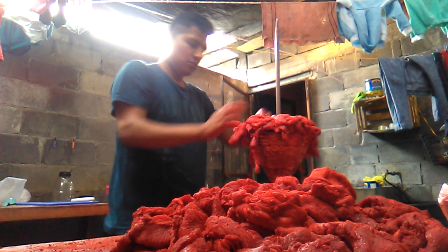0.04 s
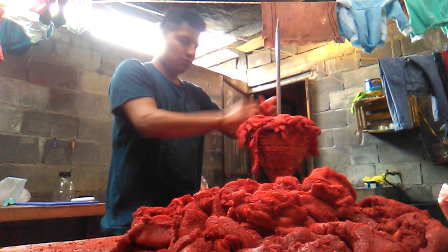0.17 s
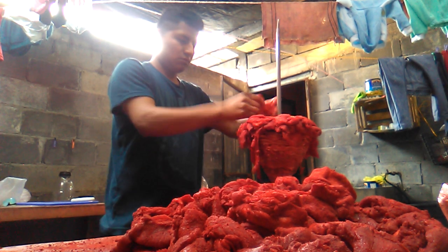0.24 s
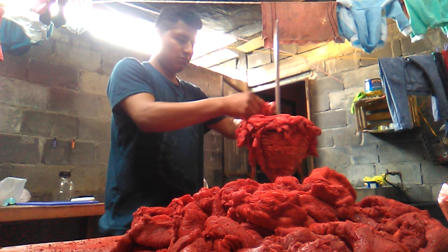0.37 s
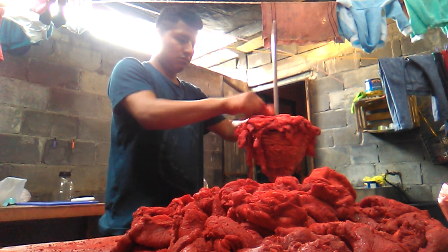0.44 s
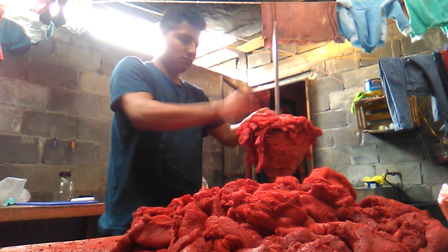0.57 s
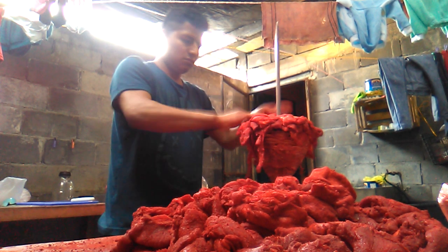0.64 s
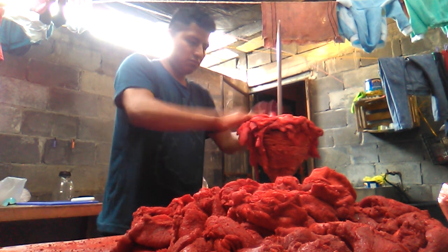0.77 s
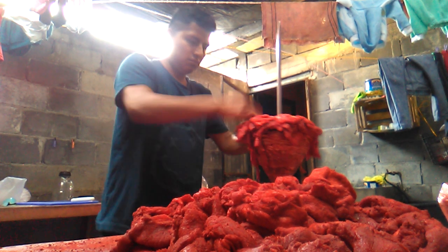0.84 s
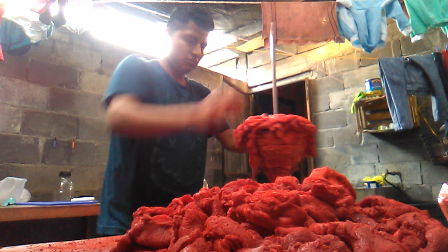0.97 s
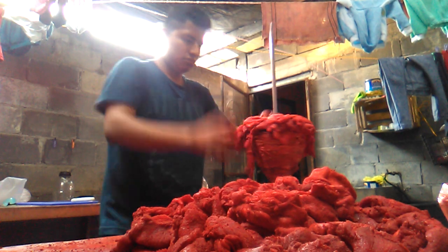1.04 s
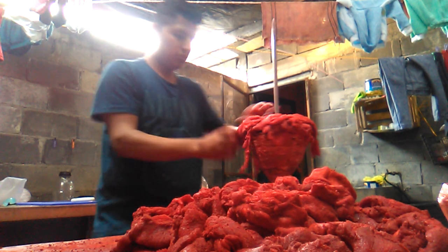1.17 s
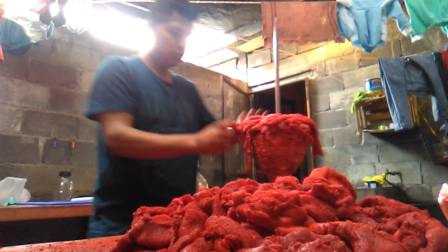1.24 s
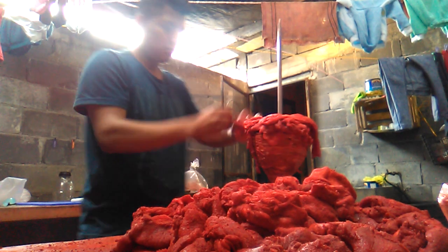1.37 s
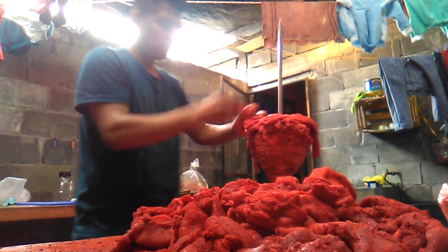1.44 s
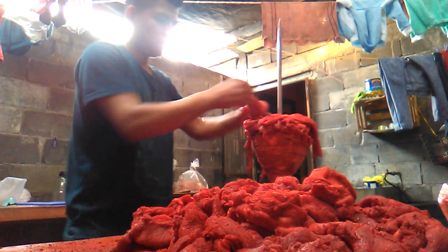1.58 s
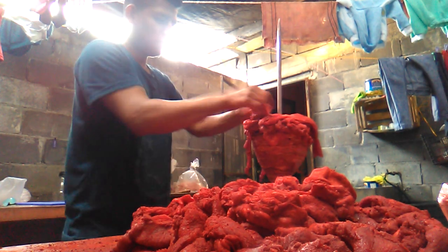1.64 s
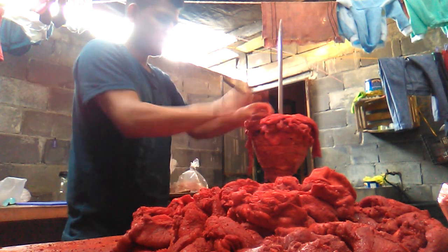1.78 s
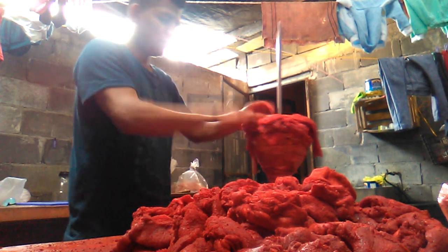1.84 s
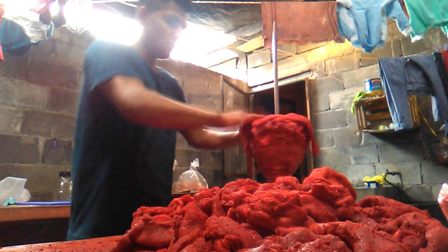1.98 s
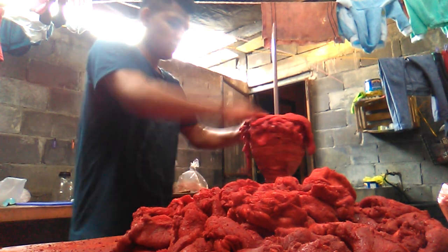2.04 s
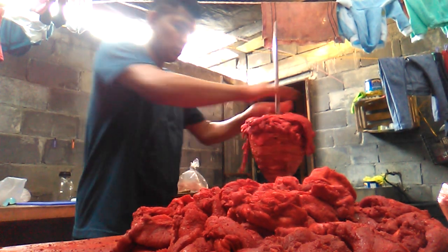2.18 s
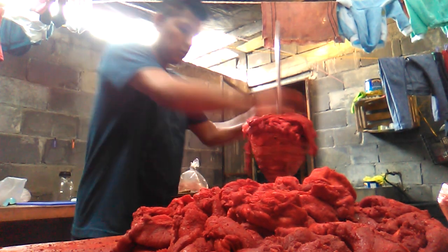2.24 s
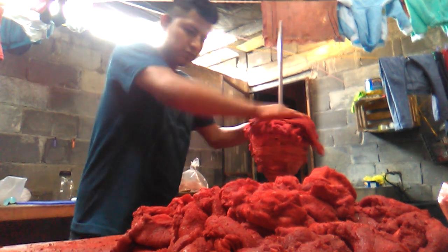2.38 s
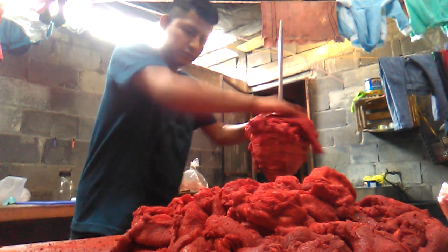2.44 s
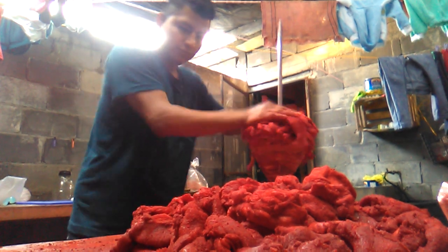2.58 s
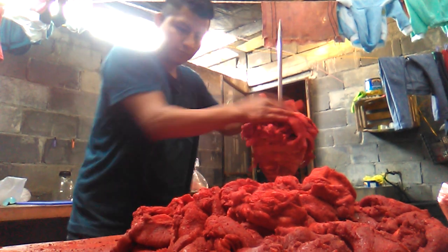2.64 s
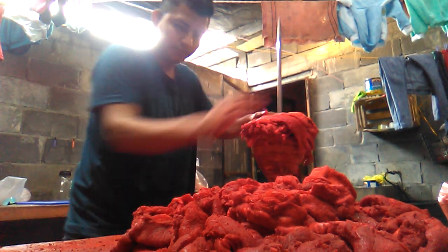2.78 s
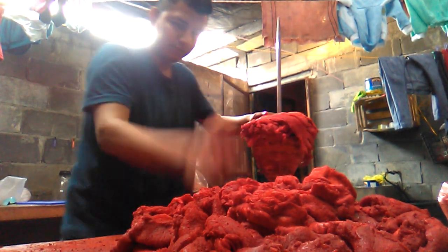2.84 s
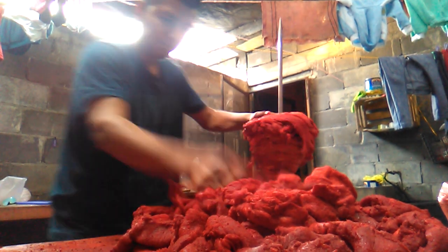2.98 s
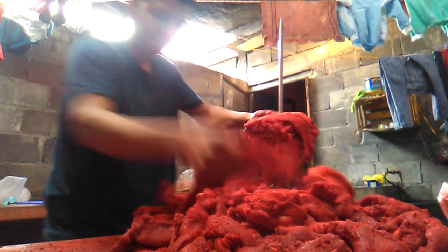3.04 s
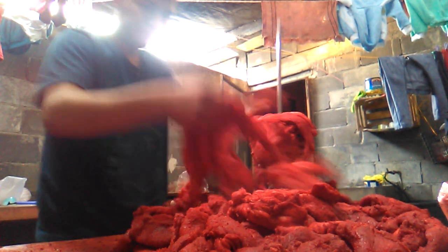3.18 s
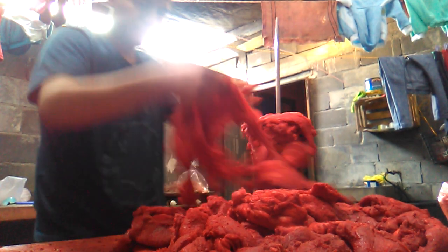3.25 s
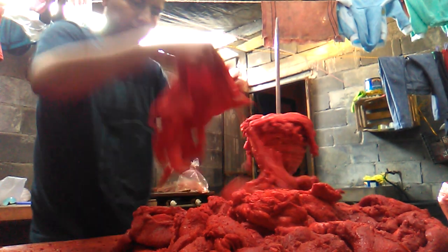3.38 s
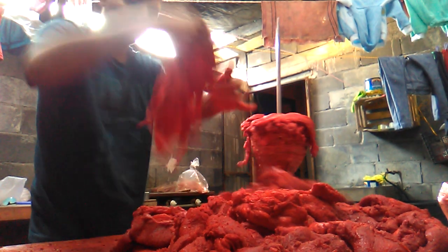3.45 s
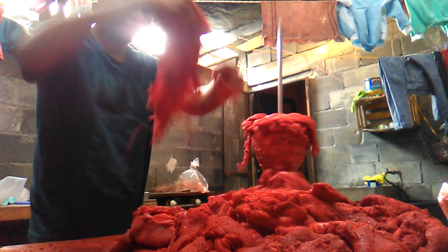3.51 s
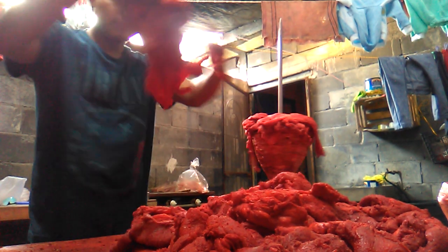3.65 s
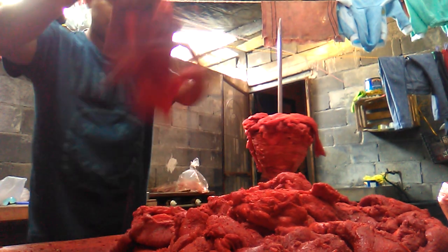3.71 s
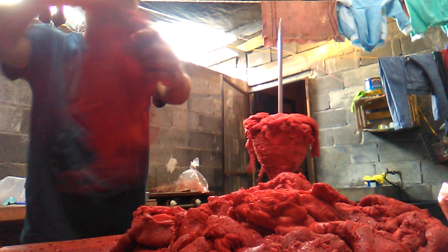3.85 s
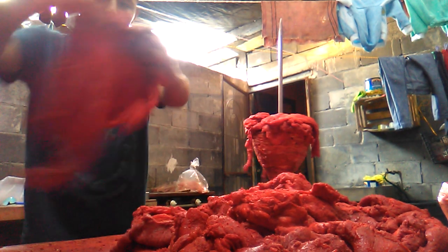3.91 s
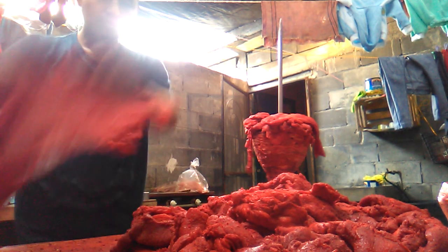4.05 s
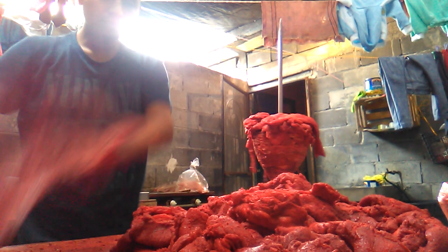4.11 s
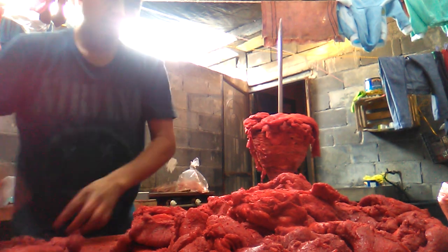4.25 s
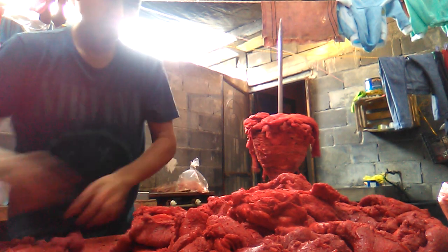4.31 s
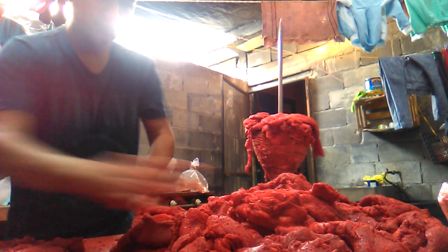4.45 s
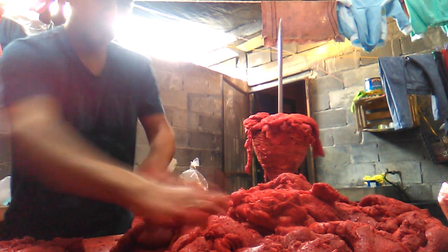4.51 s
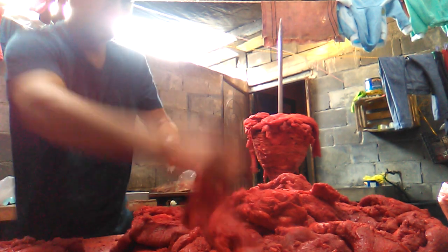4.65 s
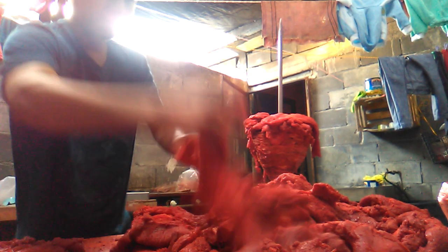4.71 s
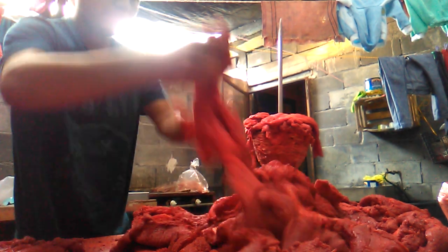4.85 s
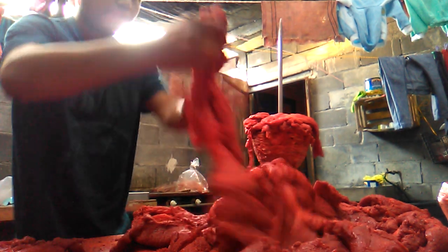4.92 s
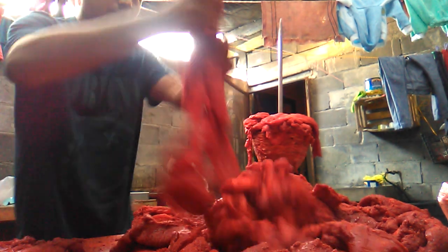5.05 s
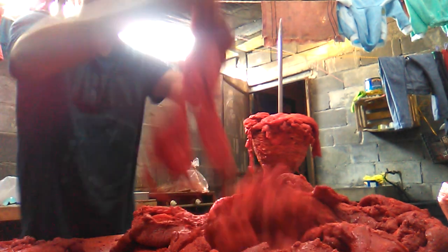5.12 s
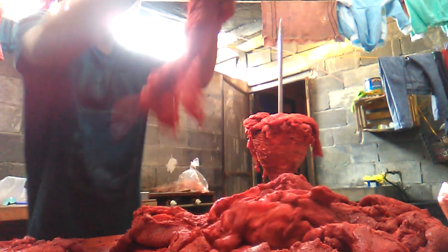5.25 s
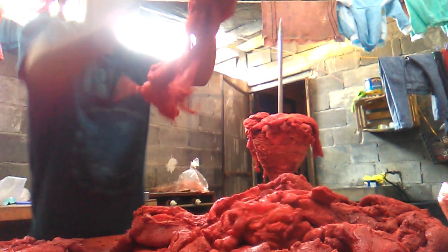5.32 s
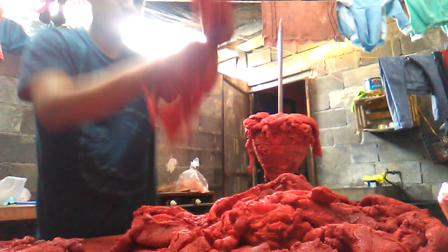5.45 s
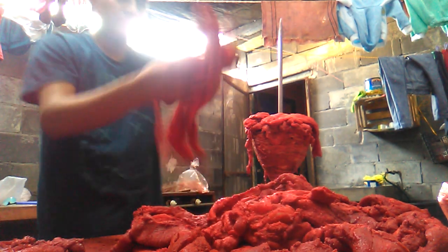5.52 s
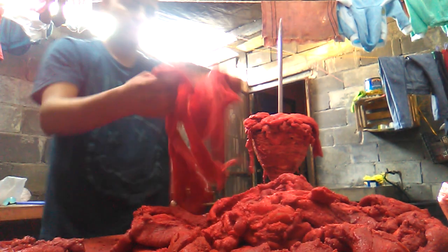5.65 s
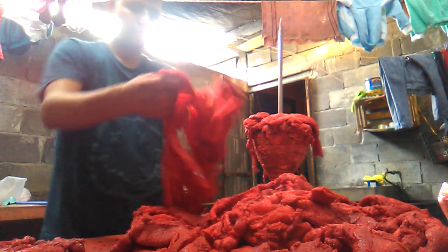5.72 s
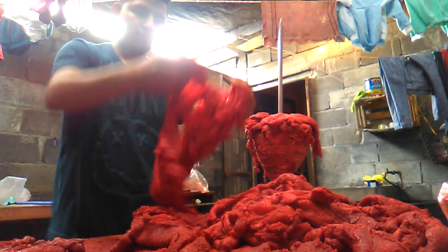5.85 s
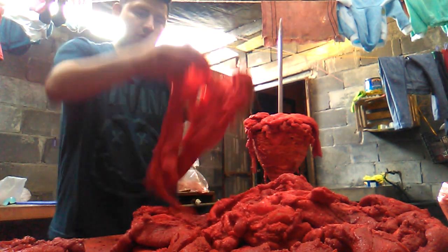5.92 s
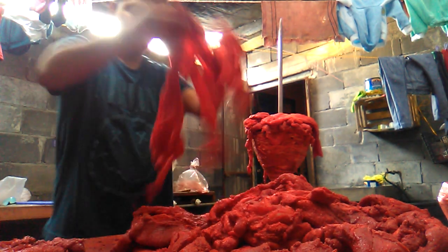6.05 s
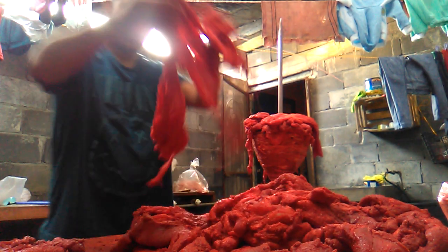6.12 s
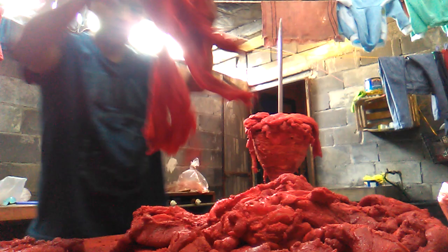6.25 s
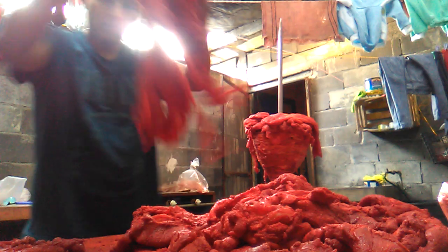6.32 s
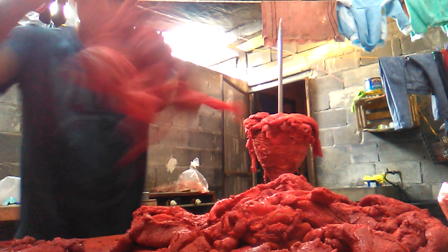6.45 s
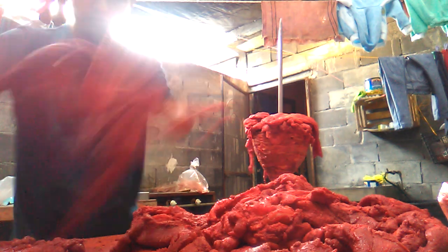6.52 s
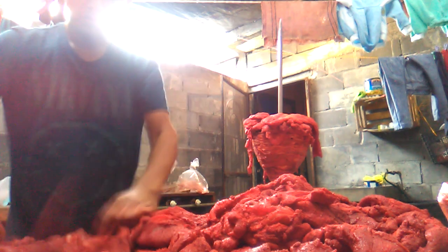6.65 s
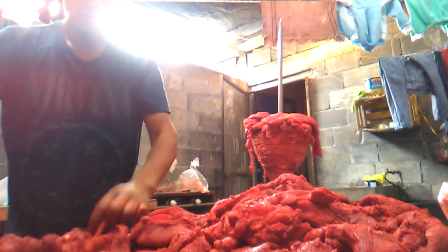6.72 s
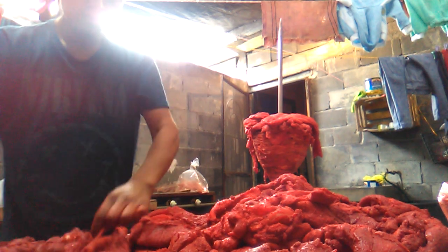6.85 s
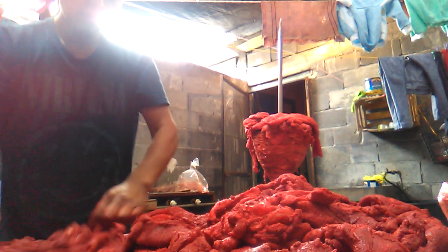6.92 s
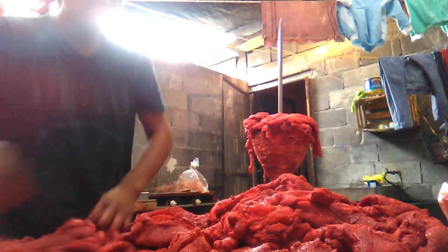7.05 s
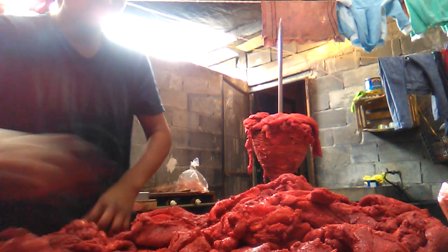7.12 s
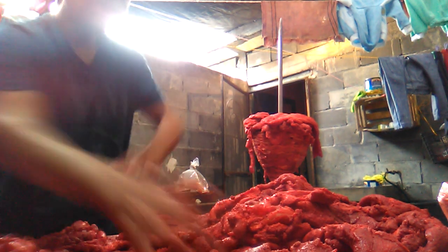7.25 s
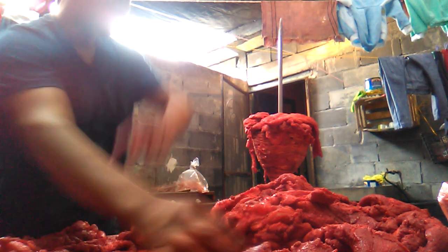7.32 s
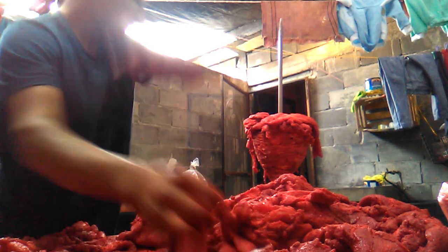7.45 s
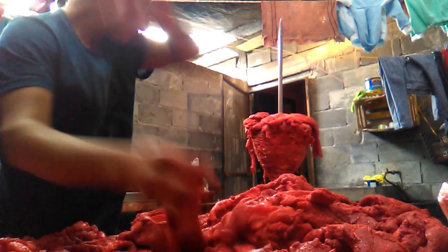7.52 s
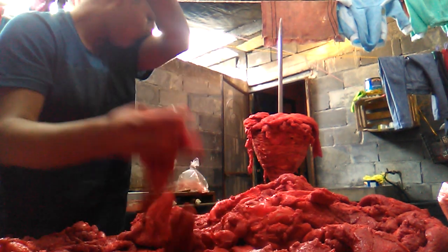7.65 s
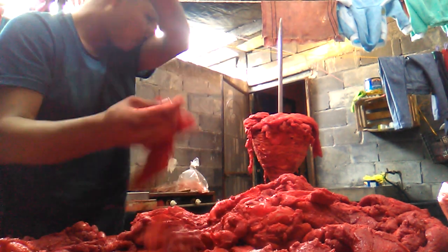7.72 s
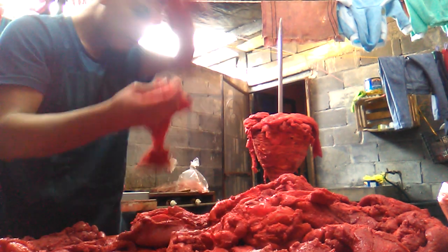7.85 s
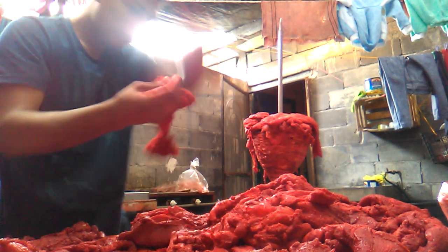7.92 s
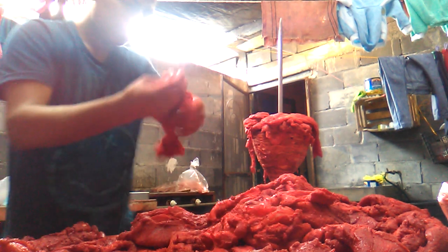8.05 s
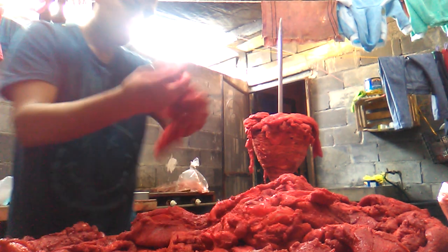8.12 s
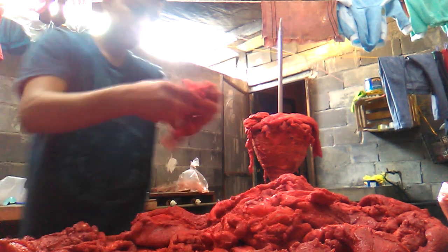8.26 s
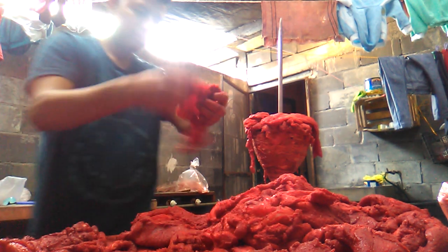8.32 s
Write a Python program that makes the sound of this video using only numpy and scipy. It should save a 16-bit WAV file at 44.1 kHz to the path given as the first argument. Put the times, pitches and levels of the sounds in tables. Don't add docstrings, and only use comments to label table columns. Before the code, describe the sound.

Wet slices of meat are softly patted, peeled with sticky crackles, and slapped down hard three times in a bare block room over faint traffic rumble.

```python
import sys
import numpy as np
from scipy import signal
from scipy.io import wavfile
from scipy.ndimage import uniform_filter1d

SR = 44100
rng = np.random.default_rng(int(sys.argv[2]) if len(sys.argv) > 2 else 0)


def master_out(mix):
    frames = np.transpose(np.atleast_2d(mix))
    ceiling = np.clip(frames, -1, 1)
    pcm = np.round(ceiling * 32767).astype(np.int16)
    wavfile.write(sys.argv[1], SR, pcm)


def ratio_of_db(decibels):
    return 10 ** (np.asarray(decibels, float) / 20)


N = 369999


def smacks():
    # t/s, body peak level/dB, body f/Hz, spray level/dB, spray f/Hz
    flaps = [(2.322, -48, 305, -51, 3800), (2.328, -15.5, 470, -53, 3100), (2.3267, -50, 830, -26.5, 4900),
             (2.329, -42, 1250, -34, 9500), (2.333, -38, 1240, -50.5, 900), (2.343, -33.5, 490, -53, 900),
             (2.357, -33, 462, -60, 4800), (4.2226, -34.5, 297, -55.5, 2300),
             (4.228, -36, 230, -39.5, 3680), (4.2325, -29.5, 219, -46.5, 1600),
             (4.232, -33.5, 800, -45, 1000), (4.237, -28, 263, -53, 3800),
             (4.243, -17.5, 1210, -17.5, 2500), (4.2436, -14.5, 1320, -25, 2700),
             (4.2444, -22, 383, -39.5, 1490), (4.2466, -15, 1320, -14, 5660), (4.2478, -27, 815, -21, 3200),
             (4.2532, -20, 210, -43.5, 1800), (4.2575, -28, 706, -42.5, 1738),
             (4.271, -30.5, 605, -45, 3300), (6.648, -43, 280, -52, 1470), (6.652, -35, 297, -56.5, 4540),
             (6.6612, -39, 510, -37.5, 4500), (6.664, -42, 300, -49.5, 1600),
             (6.672, -36.5, 500, -46, 5500), (6.6725, -47, 1100, -45.5, 1300),
             (6.6768, -27.5, 220, -43, 2900), (6.686, -39, 844, -37, 2380), (6.6921, -16.5, 340, -45, 2400),
             (6.6907, -20, 810, -22, 2400), (6.69, -42, 860, -31, 4800), (6.6957, -20, 876, -19.5, 4583),
             (6.697, -18.5, 900, -32, 2430), (6.6996, -19.5, 385, -45, 2000),
             (6.7084, -29.5, 300, -40, 2220), (6.717, -34, 423, -45.5, 2500)]
    splashes = [
        (2.331, -34, 666, -58, 4700),
        (4.211, -40, 250, -64.5, 1500),
        (4.2478, -17, 367, -50.5, 2000),
        (6.505, -66, 390, -75, 1690),
        (6.6965, -15.5, 383, -53, 2000),
    ]
    # t/s, peak level/dB
    thumps = [
        (2.328, -34.5),
        (4.2417, -15),
        (6.691, -22.5),
    ]
    # f/Hz, level/dB, t60/s
    table_modes = [(68, -4.5, .1), (94.4, 1, 0.085), (122.7, -0.5, 0.1), (156.4, 1, 0.062),
                   (306.5, -2.5, 0.039), (410, -6.5, 0.066), (716, -13.5, 0.069)]
    # f/Hz, level/dB per Hz
    spray_spectrum = [(300, -36), (800, 8.5), (2500, -1), (5000, -3.5), (7500, -9), (10000, -12.5),
                      (14500, -27)]
    spray_cycles, splash_t60_s = 42, 0.26
    squeeze_lead_cycles = 0.44
    body_highpass_hz = 62

    body, spray, t = np.zeros(N), np.zeros(N), np.arange(8192) / SR
    rows = [(*row, spray_cycles / row[-1]) for row in flaps]
    rows += [(*row, splash_t60_s) for row in splashes]
    puffs = rng.standard_normal((len(rows), 8192))
    for (s, db, hz, spray_db, spray_hz, t60), puff in zip(rows, puffs):
        add(body, s - squeeze_lead_cycles / hz, ratio_of_db(db) * squeeze(hz))
        width = 1.3 if spray_hz > 4600 else 1.6 + 5.0 * t60
        drops = band(puff, spray_hz, width) + 0.76 * puff
        rise = 1 - np.exp(-t / min(0.12 * t60, .004))
        add(spray, s, ratio_of_db(spray_db - 60 * t / t60) * rise * drops)
    for s, db in thumps:
        boom = sum(ratio_of_db(d) * ring(f, t60, 0.0044) for f, d, t60 in table_modes)
        add(body, s, ratio_of_db(db) * boom)
    highpass = signal.butter(2, body_highpass_hz, "high", fs=SR, output="sos")
    return signal.sosfilt(highpass, body), colour(spray, spray_spectrum)


def squeeze(hz):
    cycles, skew = 2.1, .8
    u = np.linspace(0, 1, round(cycles * SR / hz))
    return np.sin(np.pi * u ** skew) ** 2 * np.sin(2 * np.pi * cycles * u)


def pats():
    # t/s, peak level/dB, thud f/Hz, stand rattle level/dB, arm weight level/dB
    hits = [(0.442, -51, 371, -22, -4.5), (0.501, -55, 367, -24, -1.5), (0.845, -37, 457, -21, -11.5),
            (0.987, -53.5, 330, -20, -2.5), (1.024, -54, 454, -29, -7), (1.187, -39, 476, -21.5, -9),
            (1.346, -40.5, 490, -18, -9), (1.855, -45.5, 603, -31, -19), (1.98, -53, 334, -11, -3),
            (2.0496, -33, 438, -18, -10), (2.18, -66, 335, -25, 8), (2.294, -42.5, 376, -23.5, -8.5),
            (2.7665, -36.5, 460, -19, -10), (2.961, -42.5, 438, -28, -8.5), (3.188, -51, 410, -23, -5.5),
            (3.5617, -43, 478, -25, -6.5), (6.935, -53, 335, -21, 6)]
    heights = [0.12, .1, 0.11, 0.13, .1, 0.1, 0.17, .1, 0.15, 0.046, .1, 0.16, 0.14, .16, .1, .15, .1]
    # f/Hz, level/dB, t60/s
    stand_modes = [(900, 4.5, 0.014), (1160, -1.5, 0.008), (1600, -1.5, 0.018), (2330, -0.5, 0.011),
                   (3270, -4, 0.013), (4800, -23, 0.0049)]
    # t/s, peak level/dB
    bumps = [
        (5.074, -40.5),
        (7.339, -39),
    ]
    mode_spread, rattle_t60_s, rattle_rise_s = .01, .02, 0.0014
    push_db, bass_db = 3.5, -0.5

    out, t = np.zeros(N), np.arange(4096) / SR
    draws = rng.standard_normal((len(hits), 4096 + 2 * len(stand_modes)))
    for (s, db, hz, ring_db, weight_db), height, draw in zip(hits, heights, draws):
        rattle, (shift, sway) = draw[:4096], draw[4096:].reshape(2, -1)
        decay = ratio_of_db(-60 * t / rattle_t60_s) + 0.14 * ratio_of_db(-60 * t / 0.12)
        shake = rattle * decay * (1 - np.exp(-t / rattle_rise_s))
        knock = np.zeros(len(t))
        for (f, d, t60), v, w in zip(stand_modes, shift, sway):
            mode = signal.fftconvolve(ring(f * (1 + mode_spread * v), t60), shake)[:len(t)]
            knock += ratio_of_db(d + 0.69 * w) * np.cos(np.pi * height * f / 900) * evened(mode)
        wet = band(rattle, 850, 2.9) * ratio_of_db(-60 * t / 0.17) * (1 - np.exp(-t / 0.00067))
        wet_top = band(rattle[::-1], 2240, 1.6) * ratio_of_db(-60 * t / 0.045) * (1 - np.exp(-t / .0004))
        wet = wet + 0.75 * wet_top
        thud = ring(hz, 9 / hz, 0.0029) + 0.23 * ring(1.28 * hz, 11 / hz, 0.0043)
        push = ratio_of_db(weight_db + push_db) * ring(229.0, 0.036, 0.004)
        push = push + ratio_of_db(weight_db + bass_db) * ring(125.8, 0.1, 0.011)
        stand = ratio_of_db(ring_db) * (knock / abs(knock).max() + 0.13 * wet)
        add(out, s, ratio_of_db(db + 13.5) * (thud + push + stand))
    for s, db in bumps:
        add(out, s, ratio_of_db(db) * ring(103, 0.088, 0.0034))
    return out


def peeling():
    # t/s, length/s, level/dB, change over the stroke/dB, drag (0 lifted - 1 scraped)
    strokes = [(0.874, 0.41, -82.5, 0, 0.79), (1.904, 0.087, -83, -4, .3), (2.07, 0.32, -80, -6, 0.73),
               (2.39, 0.43, -79, -8, 0.9), (2.825, 0.28, -90, 12, 0.25), (3.116, 0.13, -79.5, 9, 0.093),
               (3.269, 0.22, -73.5, -13, .2), (4.399, 0.16, -81.5, -3.5, 0.72), (4.577, 0.1, -77, 6, 0.4),
               (4.699, 0.18, -83.5, 10, 0.31), (4.888, 0.25, -76.5, -2.5, .2),
               (5.147, 0.22, -78.5, -5.5, 0.53), (5.476, 0.11, -72.5, -11, 0.57),
               (5.596, .12, -80, -5, 0.14), (5.716, 0.45, -84, -7, 0.35), (6.46, 0.28, -79.5, -2.5, 1.14),
               (6.805, 0.188, -79.5, 11, 1.1), (6.995, 0.17, -70, -3, 0.88), (7.203, 0.14, -98, 2, 0.39),
               (7.34, 0.091, -75, 0.5, .1), (7.44, 0.068, -69.5, -1, 0.14), (7.513, 0.16, -75, 1, 0.29),
               (7.694, 0.51, -80.5, -4.5, 0.73)]
    # f/Hz, level/dB per Hz
    film_spectrum = [(1180, -42), (2000, -2), (2160, -10), (2490, -11), (3970, 2), (4460, 1), (5720, 2),
                     (8200, -13), (10700, -62), (18000, -120)]
    # f/Hz, level/dB per Hz
    air_spectrum = [(7500, -16), (9000, -0.5), (10500, 2.5), (12500, -1), (14500, -10)]
    # f/Hz, level/dB per Hz
    slide_spectrum = [(530, -23), (900, -0.5), (1500, -2), (1910, -3), (3150, -9), (4370, -23), (7940, -19),
                      (9000, -26), (11700, -49), (19800, -120)]
    edge_s = 0.019
    scrape_db, air_db = (-9, 2.5), (-3.5, -16)
    slots_per_s, bursts_per_s, spread_db, cycles, smooth = 4000, 1500, 3.5, 12.0, 1.2
    grain_hz = np.geomspace(2800, 8500, num=12)

    level, low, air = np.zeros((3, N))
    for s, length, db, change_db, drag in strokes:
        t = np.arange(-edge_s, length + edge_s, 1 / SR)
        edge = np.clip(np.minimum(t, length - t) / edge_s + 1, 0, 2)
        stroke = np.sin(np.pi * edge / 4) ** 2 * ratio_of_db(db + change_db * t / length)
        start = s - edge_s
        add(level, start, stroke)
        add(low, start, stroke * ratio_of_db(scrape_db[0] + drag * (scrape_db[1] - scrape_db[0])))
        add(air, start, stroke * ratio_of_db(air_db[0] + drag * (air_db[1] - air_db[0])))

    count, grains = round(slots_per_s * N / SR), np.zeros(N + 1024)
    at, size, kind, keep = rng.random((count, 4)).T
    burst_gain = ratio_of_db(spread_db * np.minimum(-np.log(size + 1e-9), 3.4))
    burst_gain = (keep < bursts_per_s / slots_per_s) * burst_gain
    for k, hz in enumerate(grain_hz):
        t = np.arange(round(cycles * SR / hz)) / SR
        grain = ratio_of_db(read(film_spectrum, hz)) * np.sqrt(hz) * np.hanning(len(t)) * np.sin(2 * np.pi * hz * t)
        mine = (kind * len(grain_hz)).astype(int) == k
        places = (at[mine] * N).astype(int)[:, None] + np.arange(len(t))
        np.add.at(grains, places, burst_gain[mine][:, None] * grain)
    film = evened(grains[:N]) + smooth * noise(film_spectrum, patchy_db=4.0, size=512)
    hiss = air * noise(air_spectrum, patchy_db=2.2, size=512)
    scrape = low * noise(slide_spectrum, patchy_db=-1.5, size=512)
    return level * evened(film) + hiss + scrape


def snaps():
    # t/s, peak level/dB, f/Hz
    wet_pops = [(0.6594, -64, 4960), (1.2794, -62, 4620), (1.8462, -53, 5000), (2.0033, -42, 4700),
                (2.2837, -54, 4440), (2.4598, -57, 5000), (2.5451, -50, 4560), (2.6643, -70, 3900),
                (2.7402, -49.5, 3980), (3.2181, -52, 5430), (3.3164, -45.5, 4200), (4.0432, -55, 4540),
                (4.0726, -70, 4800), (4.6189, -61, 5680), (4.6498, -51, 5940), (4.6644, -50, 4200),
                (4.8494, -61, 5690), (5.4889, -61.5, 5800), (5.601, -45, 4820), (5.6336, -55.5, 5650),
                (5.6594, -58, 4650), (5.7344, -54.5, 6230), (7.457, -50.5, 4550), (7.4694, -49, 4330),
                (7.5053, -52, 4800), (7.5358, -52, 4170), (7.6455, -61, 5340),
                (2.5405, -60, 7500), (2.5, -50, 4700), (3.808, -64, 6200), (4.657, -45.5, 5300),
            (4.897, -61, 3900), (6.3, -55, 8200), (5.677, -64, 4200), (5.767, -62, 4100),
            (7.405, -62, 4800), (7.436, -53, 4800), (7.463, -52, 3700), (7.663, -59, 6300),
            (6.8, -53, 4000), (5.9, -60, 4800), (6.2, -58, 4200), (7.518, -62, 4900), (7.45, -54, 4000),
            (7.565, -64, 4800), (7.578, -61, 5700), (7.648, -61.5, 3600), (7.334, -62.5, 4700),
            (5.707, -62, 7200), (5.2, -61, 3600)]
    return pops(wet_pops, cycles=4.7, width=1.25)


def clucks():
    # t/s, peak level/dB, f/Hz
    pockets = [(2.5461, -51, 1570), (2.7398, -51, 900), (2.747, -46, 1000), (3.3294, -50.5, 1220),
               (3.3932, -53, 1150), (3.6124, -61, 1180), (3.7184, -47, 1350), (3.7668, -53, 1400),
               (3.8067, -58, 1450), (3.9499, -46.5, 1360), (4.0432, -57, 1815), (5.4849, -53.5, 1250),
               (1.8555, -42, 680), (5.6015, -62.5, 2300), (5.6015, -51, 3300), (3.6925, -65, 1400),
               (1.983, -56, 1400), (3.541, -59, 1700), (3.72, -49, 800), (7.687, -58, 1900)]
    return pops(pockets, cycles=3, width=1.45)


def pops(rows, cycles, width):
    pop_t60_s, shorter_db_per_db = 0.015, 0.24
    out, t = np.zeros(N), np.arange(1024) / SR
    for (s, db, hz), puff in zip(rows, rng.standard_normal((len(rows), 1024))):
        t60 = pop_t60_s * ratio_of_db(-shorter_db_per_db * max(db + 57, 0))
        puff = band(puff, hz, width) * ratio_of_db(-60 * t / t60) * (1 - np.exp(-t / 0.00038))
        tone = ring(hz, cycles / hz, .0004)[:1024]
        add(out, s, ratio_of_db(db + 5) * (.7 * tone + 0.32 * puff))
    return out


def squeaks():
    # t/s, length/s, level/dB, f/Hz
    slips = [
        (5.48, 0.034, -74.5, 2650),
        (6.509, 0.092, -64, 1650),
        (6.51, .055, -75, 2050),
        (6.508, 0.049, -69, 2550),
        (5.9, 0.073, -75.5, 3200),
        (8.022, 0.14, -74.5, 1380),
        (5.482, 0.013, -66.5, 5500),
    ]
    width, fade_db, rise_s = 1.07, -12, 0.0077
    out = np.zeros(N)
    for (s, length, db, hz), puff in zip(slips, rng.standard_normal((len(slips), 8192))):
        t = np.arange(0, length, 1 / SR)
        edges = np.clip(np.minimum(t, length - t) / rise_s, 0, 1)
        add(out, s, ratio_of_db(db + fade_db * t / length) * edges * band(puff, hz, width)[-len(t):])
    return out


def room(x):
    # f/Hz, t60/s
    decay = [(100, 0.27), (400, 0.22), (1200, 0.25), (3000, 0.24), (5000, 0.24), (9000, 0.04),
             (14000, 0.13)]
    taps = np.zeros(SR // 2)
    at = np.arange(130, SR // 2 - 10, 10)
    taps[at + rng.integers(0, 10, len(at))] = rng.choice([-1., 1.], len(at))
    hz, t, z = signal.stft(taps, SR, nperseg=256)
    z = z / (abs(z) + 1e-9) ** .8
    tail = signal.istft(z * ratio_of_db(-60 * t / read(decay, hz)[:, None]), SR, nperseg=256)[1]
    return signal.oaconvolve(x, tail / np.linalg.norm(tail))[:N]


def street():
    # f/Hz, level/dB per Hz
    rumble_spectrum = [(12, -72), (20, -39.5), (41, -27.5), (60, 1), (73, -2), (96, -10), (140, -16),
                       (162, -14.5), (188, -20.5), (260, -22.5), (340, -34.5), (570, -120)]
    # t/s, swell/dB, half width/s
    surges = [(.3, 1, 0.29), (.8, 2, 0.36), (1.4, 4, 0.21), (2.3, 1.5, 0.36), (3.3, 3.5, 0.18),
              (4.55, 3.5, 0.19), (5.3, -0.5, 0.18), (6.3, 1.5, 0.28), (6.75, 7.5, 0.18), (7.148, 1.5, 0.13),
              (7.82, 5, 0.2)]
    # f/Hz, level/dB per Hz
    wash_spectrum = [(76, -30), (130, 0.5), (178, -10.5), (251, -8), (282, -10), (318, -9.5), (483, -12.5),
                     (620, -12), (1010, -23.5), (1200, -25), (1360, -33.5), (1580, -38), (3000, -41),
                     (3900, -68.5), (6600, -120)]
    # t/s, level/dB
    traffic = [(0.0, -66.5), (0.25, -64), (0.6, -61), (1.2, -63), (1.55, -65.5), (2.3, -61), (3.2, -64),
               (3.55, -59.5), (4.5, -61.5), (5.3, -61), (5.75, -58.5), (6.3, -56.5), (6.6, -58),
               (6.82, -55.5), (7.15, -60.5), (7.6, -62.5), (8.18, -60), (8.39, -60.5)]
    # f/Hz, level/dB
    standing_modes = [(249, 0), (312, 1.5), (330, -1.5), (382, -4.5), (415, 2.5), (475, -5), (495, -1.5),
                      (570, -2), (775, -13.5), (829, -10)]
    # t/s, half length/s, f/Hz, waver/Hz, level/dB
    car = (5.5, 1.87, 123.5, 3.5, -62.5)
    rumble_db, standing_db, standing_width_hz = -58, -4, 41
    nearness = 0.28

    t = np.arange(N) / SR
    swell_db = sum(db * np.exp(-((t - s) / width) ** 2) for s, db, width in surges)
    rumble = ratio_of_db(rumble_db + swell_db) * noise(rumble_spectrum, patchy_db=1.0, size=4096)
    near_db = np.interp(t, *np.transpose(traffic))
    wash = ratio_of_db(-3.5) * noise(wash_spectrum, patchy_db=2.0, size=2048)
    standing = ratio_of_db(standing_db + nearness * (near_db + 61.5)) * bands(standing_modes, standing_width_hz)
    s, half, hz, waver_hz, db = car
    waver, throb = (evened(uniform_filter1d(v, size=2500)) for v in rng.standard_normal((2, N)))
    passing = ratio_of_db(db + 2.5 * throb) * np.exp(-((t - s) / half) ** 4)
    engine = passing * np.sin(2 * np.pi * np.cumsum(hz + waver_hz * waver) / SR)
    return rumble + ratio_of_db(near_db) * (wash + standing) + engine


def evened(x):
    return x / np.sqrt(np.mean(x ** 2) + 1e-20)


def read(points, hz):
    f, value = np.transpose(points)
    return np.interp(np.log(hz + 1), np.log(f + 1), value)


def add(mix, s, sound):
    part = mix[round(s * SR):][:len(sound)]
    part += sound[:len(part)]


def ring(hz, t60, rise=.0003):
    t = np.arange(4096) / SR
    return ratio_of_db(-60 * t / t60) * (1 - np.exp(-t / rise)) * np.sin(2 * np.pi * hz * t)


def band(x, hz, width):
    edges = [hz / width, min(hz * width, 20000)]
    return evened(signal.sosfilt(signal.butter(2, edges, "band", fs=SR, output="sos"), x))


def colour(x, points):
    gain = np.log(ratio_of_db(np.maximum(read(points, abs(np.fft.fftfreq(4096, 1 / SR))), -90)))
    taps = np.fft.ifft(np.exp(np.conj(signal.hilbert(gain)))).real[:2048]
    return signal.oaconvolve(x, taps / np.linalg.norm(taps))[:len(x)]


def noise(points, patchy_db, size):
    frames, hz = 2 * N // size + 3, np.fft.rfftfreq(size, 1 / SR)
    a, b, patches = rng.standard_normal((frames, len(hz), 3)).T
    patches = evened(uniform_filter1d(uniform_filter1d(patches, size=6, axis=0), size=4, axis=1))
    z = (a + 1j * b) * ratio_of_db(read(points, hz)[:, None] + patchy_db * patches)
    window = np.sqrt(signal.windows.hann(size, sym=False))
    return evened(signal.istft(z, window=window, nperseg=size, noverlap=size // 2)[1][:N])


def bands(rows, width_hz):
    hz = np.arange(1, SR // 2, 3)
    gain = sum(ratio_of_db(db) / (1 + (2 * (hz - f) / width_hz) ** 2) for f, db in rows)
    return noise(np.c_[hz, 20 * np.log10(gain)], patchy_db=3.0, size=8192)


def scene():
    body, spray = smacks()
    far = pats()
    snapping = snaps()
    clucking = clucks() + squeaks()
    sent = ratio_of_db(-15.0) * body + ratio_of_db(-24) * spray
    sent = sent + ratio_of_db(-5.5) * snapping + ratio_of_db(-8.5) * clucking + ratio_of_db(-8) * far
    direct = body + spray + snapping + clucking + far
    return (direct + room(sent) + peeling() + street())[None]


def low_pass(x):
    return signal.sosfilt(signal.butter(12, 14800, fs=SR, output="sos"), x)


def record(dry):
    # f/Hz, level/dB per Hz
    hiss_spectrum = [(530, -14.5), (900, -1), (2010, -13), (2340, -14.5), (2540, -15), (3920, -16.5),
                     (13700, -26.5), (14600, -23)]
    hiss_db, bass_cut_hz, edge_hz = -74, 46, 14290
    x = dry + ratio_of_db(hiss_db) * noise(hiss_spectrum, patchy_db=0.7, size=1024)
    x = signal.sosfilt(signal.butter(2, bass_cut_hz, "high", fs=SR, output="sos"), x)
    lowpass = signal.firwin(511, edge_hz, window=("kaiser", 9), fs=SR)
    x = signal.oaconvolve(x, lowpass[None], "same")
    return low_pass(x)


dry = scene()
out = record(dry)
master_out(out)
```